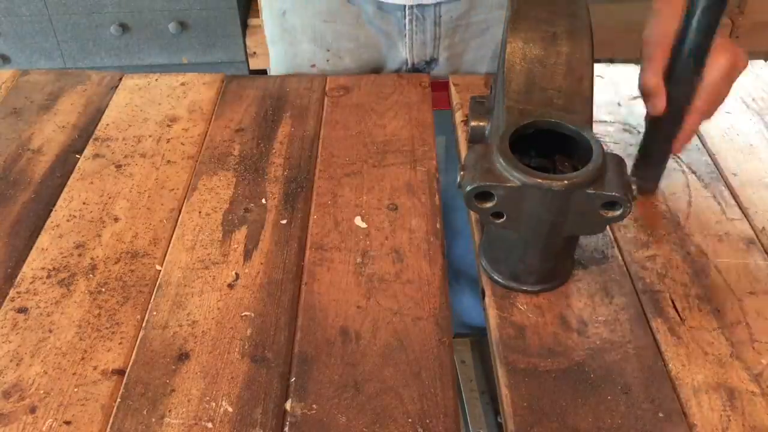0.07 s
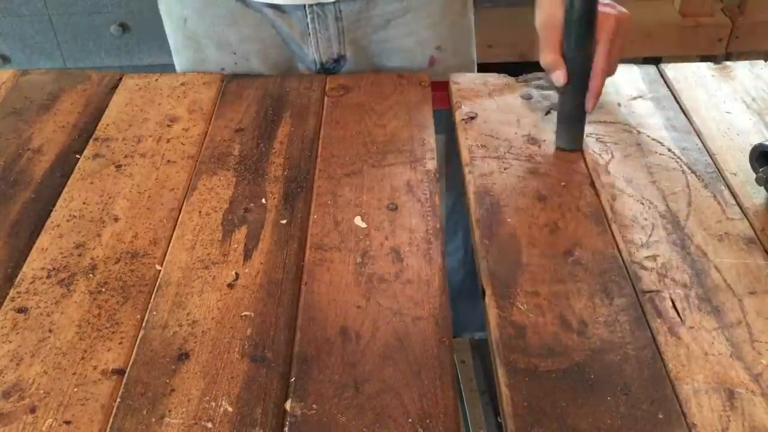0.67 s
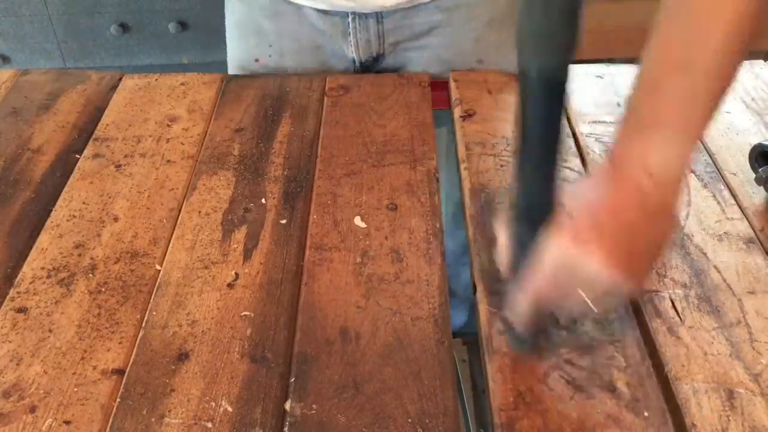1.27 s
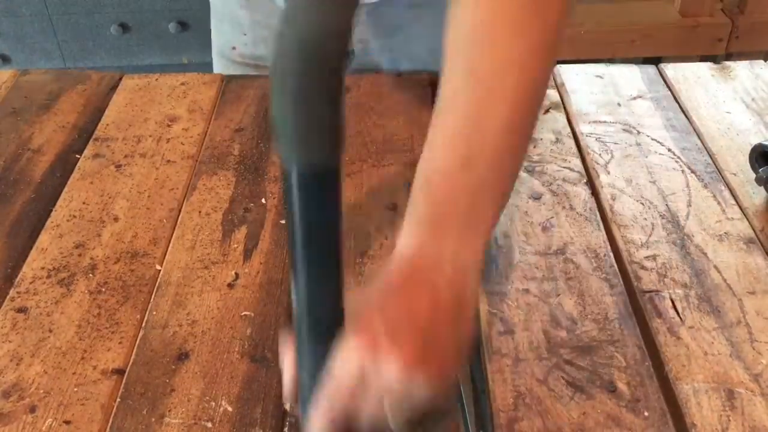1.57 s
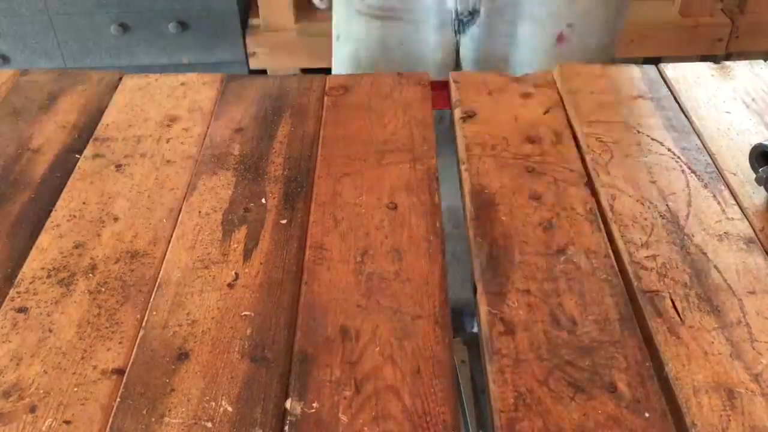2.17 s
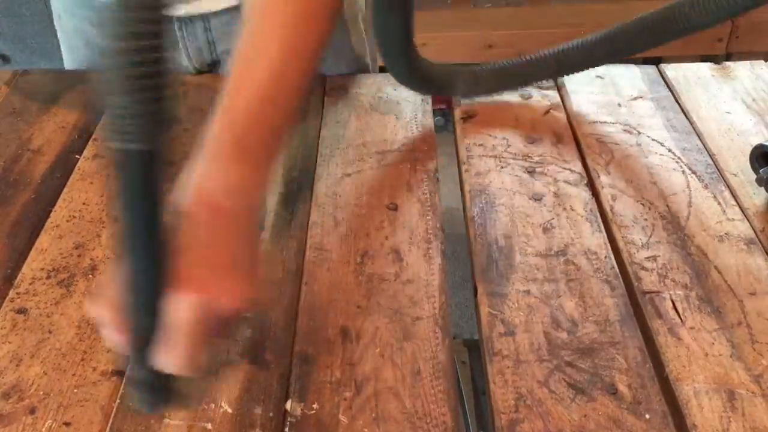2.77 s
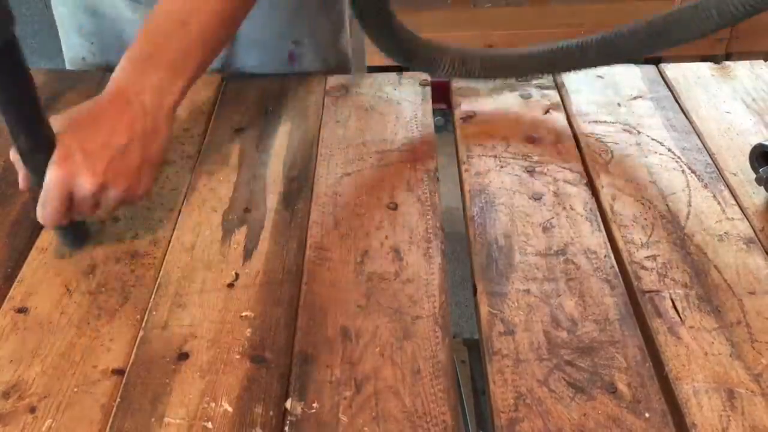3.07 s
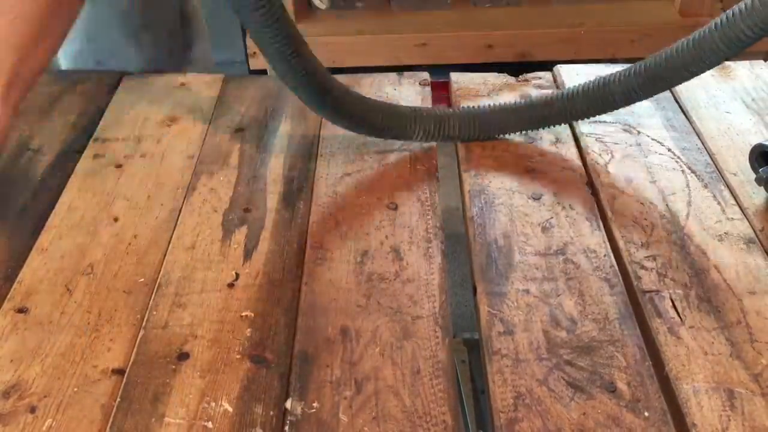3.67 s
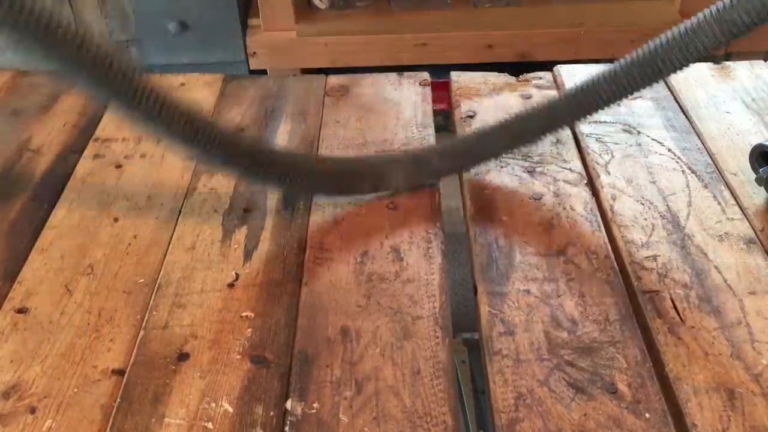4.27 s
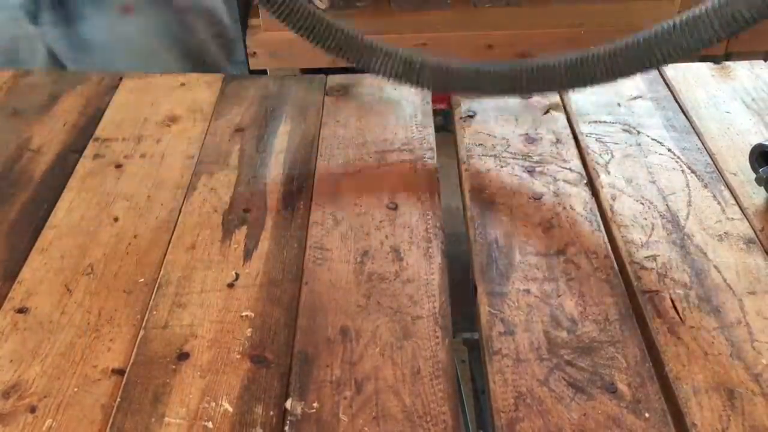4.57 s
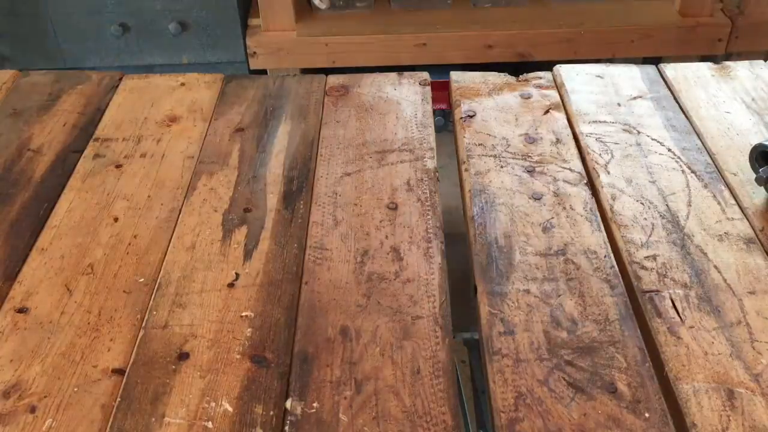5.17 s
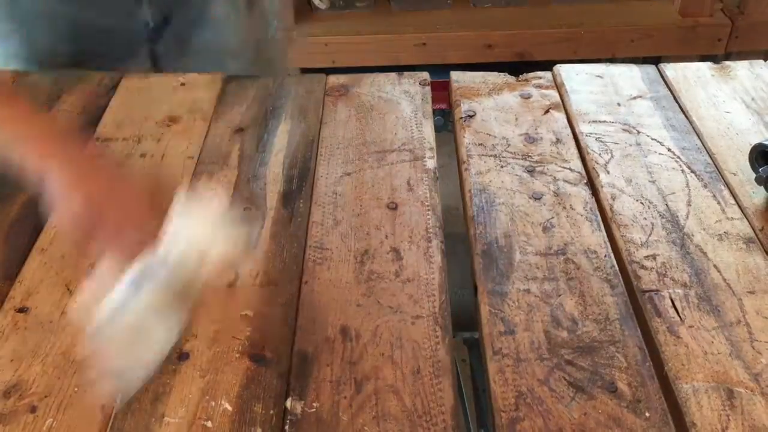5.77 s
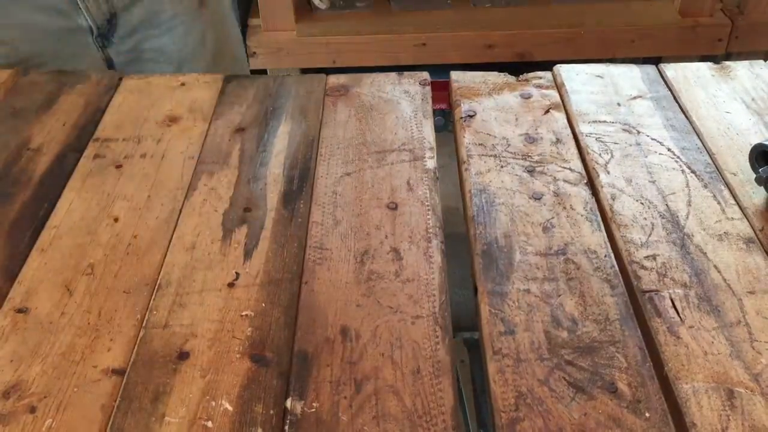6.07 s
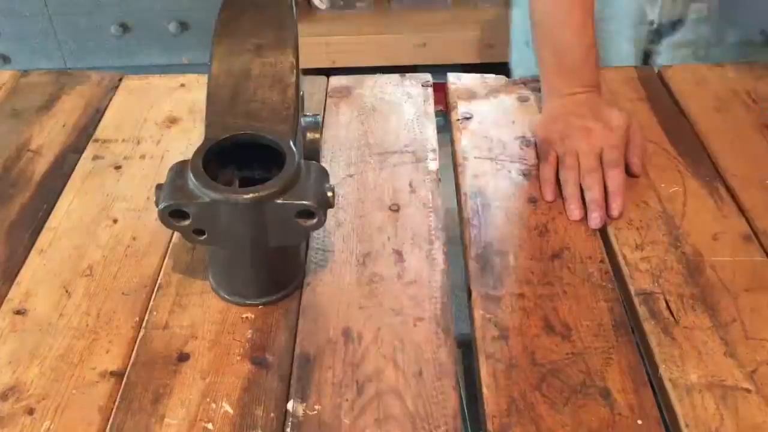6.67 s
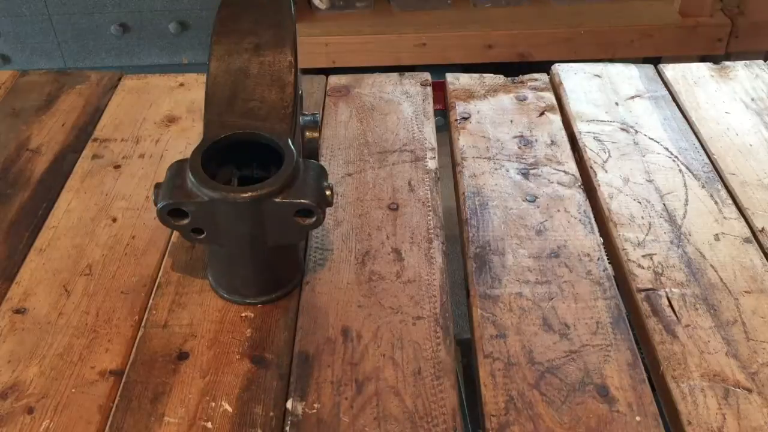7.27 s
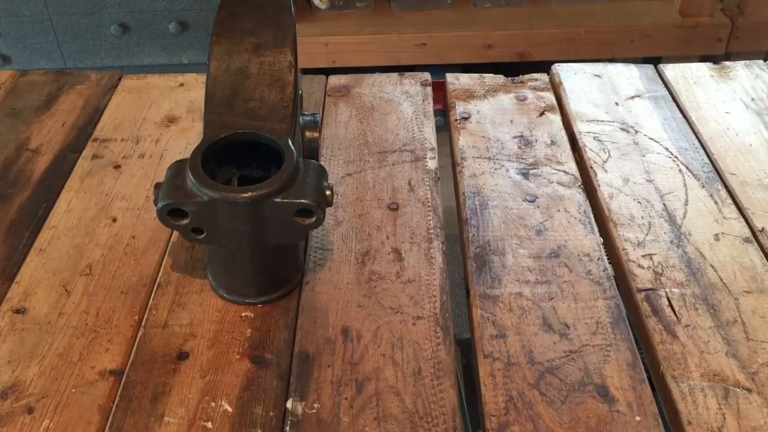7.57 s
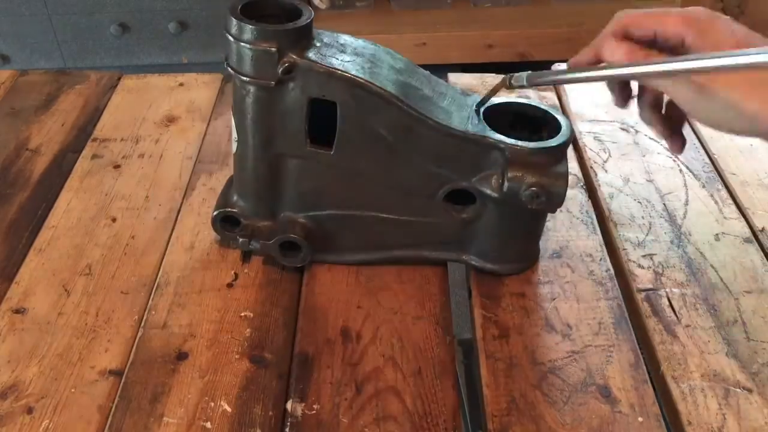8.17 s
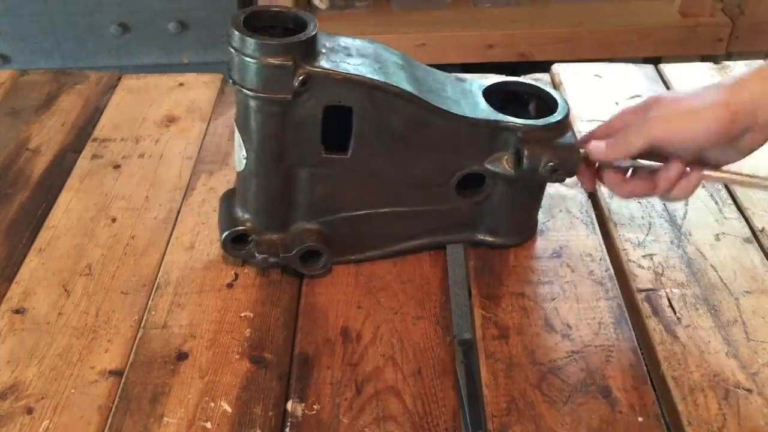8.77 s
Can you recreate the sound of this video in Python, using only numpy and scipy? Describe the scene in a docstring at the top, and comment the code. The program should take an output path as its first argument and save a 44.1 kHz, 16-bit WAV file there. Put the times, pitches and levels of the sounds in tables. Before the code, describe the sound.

A vacuum cleaner hisses and whines, then spins down, followed by quick knocks on wood and a wire brush scrubbing metal, all sped up.

```python
"""Workshop chores in fast motion, so every sound is high and short. First a vacuum cleaner hisses and
whines over a plank bench, sucking up grit; near 5 s it is switched off and spins down. Next a rag wipes
the planks while a steel casting and tools knock on them, followed by small slides and clicks. From about
8 s a wire brush on a rod scrubs and rattles in the casting's bores. A faint room hum lies under it all."""
import sys
import numpy as np
from scipy import signal
from scipy.fft import rfft, irfft, next_fast_len
from scipy.io import wavfile
from scipy.ndimage import map_coordinates

SR = 44100
rng = np.random.default_rng(int(sys.argv[2]) if len(sys.argv) > 2 else 0)


def transcribe(u):
    """Save the signal u as a 16-bit wav file named by the first command-line argument.

    u: samples, shape (n,) or (channels, n), limited to [-1, 1]; the rate is SR.
    q: integer samples, one column per channel.
    """
    v = np.clip(np.atleast_2d(u).T, -1, 1)
    q = np.round(v * 32767).astype(np.int16)
    wavfile.write(sys.argv[1], SR, q)


N = 398663


def amp(db):
    """Decibels to gain."""
    return 10 ** (np.asarray(db) / 20)


def unit(x):
    """Scale to rms 1."""
    return x / np.sqrt(np.mean(x ** 2) + 1e-20)


def clock():
    """The time of every sample, in seconds."""
    return np.arange(N) / SR


def automation(points):
    """A lane of straight ramps through (time [s], value) points."""
    return np.interp(clock(), *np.transpose(points))


def wobble(rate):
    """A smooth random modulator with rate knots a second."""
    return map_coordinates(rng.standard_normal(int(N * rate / SR) + 4), [clock() * rate])


def filtered(x, response):
    """EQ x with a gain that is a function of frequency."""
    size = next_fast_len(N + SR // 2)
    return irfft(rfft(x, size) * response(np.fft.rfftfreq(size, 1 / SR)), size)[..., :N]


def noise(spectrum):
    """Noise of rms 1 coloured by (frequency [Hz], level [dB]) points."""
    points_hz, db = np.transpose(spectrum)
    colour = lambda hz: amp(np.interp(np.log(hz + 1), np.log(points_hz + 1), db))
    return unit(filtered(rng.standard_normal(N), colour))


def ringing(modes):
    """Noise of rms 1 through (frequency [Hz], width [Hz], level [dB]) resonances."""
    body = lambda f: sum(amp(db) / (1 + (2 * (f - hz) / width) ** 2) for hz, width, db in modes)
    return unit(filtered(rng.standard_normal(N), body))


def tone(hz):
    """A sine of rms 1 that follows a pitch curve."""
    return np.sqrt(2) * np.sin(2 * np.pi * np.cumsum(hz) / SR)


def add(track, s, sound):
    """Mix a short sound into a track at time s."""
    part = track[round(s * SR):][:len(sound)]
    part += sound[:len(part)]


def hits(times, levels_db, attack, t60):
    """A percussive envelope that jumps at each hit and dies away; attack and t60 in seconds."""
    power, t = np.zeros(N), np.arange(SR // 8) / SR
    for s, db in zip(times, levels_db):
        add(power, s, (amp(db - 60 * t / t60) * (1 - np.exp(-t / attack))) ** 2)
    return np.sqrt(power)


def gates(times, lengths, levels_db, edge):
    """An envelope that holds for each length, with soft edges; edge in seconds."""
    power = np.zeros(N)
    for s, length, db in zip(times, lengths, levels_db):
        start = max(s - 4 * edge, 0)
        t = np.arange(round((length + 8 * edge) * SR)) / SR + start - s
        fade_in = (1 + np.tanh(t / edge)) / 2
        fade_out = (1 - np.tanh((t - length) / edge)) / 2
        add(power, start, amp(db) ** 2 * fade_in * fade_out)
    return np.sqrt(power)


# body of the airflow: (frequency [Hz], level [dB])
RUSH_EQ = [(20, -2), (400, -3.5), (950, -3), (1200, -3.5), (1500, -2), (2600, -1.5), (3300, -2), (3800, 0),
           (4300, -1), (5500, -5), (9000, -55)]
# bright fizz on top: (frequency [Hz], level [dB])
FIZZ_EQ = [(2500, -60), (4000, -12), (5000, -3), (5700, -3), (6700, -1), (8500, -2.5), (10500, -1.5),
           (12200, 0), (13000, -0.5), (15000, 4), (16000, -2)]
# the nozzle's cavity: (frequency [Hz], width [Hz], level [dB])
NOZZLE_MODES = [(1730, 240, -0.5), (3180, 410, -1), (12140, 610, 5), (13400, 450, 2.5), (15000, 520, -0.5)]
HOSE_LAG_S, RUSH_DB_PER_DECADE, FIZZ_DB_PER_DECADE = 0.032, 43.18, 34  # how the air follows fan speed


def suction():
    """Turbulent air in the nozzle and hose rings the nozzle's cavity at first and dies with the fan."""
    rush = amp(-45.5 + RUSH_DB_PER_DECADE * np.log10(coasting_speed(HOSE_LAG_S))) * noise(RUSH_EQ)
    fizz = amp(-37.5 + FIZZ_DB_PER_DECADE * np.log10(coasting_speed(0))) * noise(FIZZ_EQ)
    cavity = gates([0], [2.25], [-48], edge=0.02) * amp(1.9 * wobble(8.8)) * ringing(NOZZLE_MODES)
    fade_db = -90 * np.maximum(clock() - 5.27, 0)
    return amp(fade_db + 0.5 * wobble(40)) * (rush + fizz + cavity)


# the whine's drift with fan speed: (time [s], base pitch [Hz])
WHINE_PITCH = [(0, 4700), (0.42, 4700), (0.57, 4667), (0.68, 4706), (1, 4670), (1.5, 4729), (1.9, 4780),
               (2.25, 4662), (2.5, 4720), (2.75, 4720), (3.05, 4766), (3.3, 4723), (3.46, 4780), (4, 4720),
               (4.55, 4743), (4.92, 4690)]
# the whine's fader, low while the nozzle works close over the bench: (time [s], base level [dB])
WHINE_LEVEL = [(0, -50), (1, -46), (1.3, -55.5), (1.72, -54), (2.12, -40), (2.235, -56), (2.265, -36.5),
               (3.3, -39.0), (4.08, -36.5), (4.19, -41), (4.72, -38.5), (4.87, -39.5), (4.93, -57.5)]
# the nozzle seals on a plank for a moment and the unloaded fan races: (time [s], pitch rise [Hz])
NOZZLE_SEALS = [(0.32, 89), (1.13, 91), (1.35, 110), (2.08, 81), (2.83, 54), (3.12, 29), (3.67, 12),
                (4.61, 31)]
SEAL_RAMP_S, CHOKE_DB_PER_HZ = 0.04, 0.104
SKIM_START_S, SKIM_LENGTH_S, FLUTTER_HZ = 1.1, 1.0, 15.3  # skimming the planks adds flutter to the fan
SWITCH_OFF_S = 4.962


def fan():
    """The blades whine, higher and weaker when the nozzle is choked; the hose whistle rides on top."""
    skimming = gates([SKIM_START_S], [SKIM_LENGTH_S], [0], edge=0.018)
    surges_hz = sum(rise * np.exp(-((clock() - s) / SEAL_RAMP_S) ** 2) for s, rise in NOZZLE_SEALS)
    racing_hz = surges_hz + (5.5 + FLUTTER_HZ * skimming) * wobble(18)
    fan_hz = automation(WHINE_PITCH) + racing_hz
    rough_hz = fan_hz + (2 + 5 * skimming) * wobble(120)
    level_db = automation(WHINE_LEVEL) - CHOKE_DB_PER_HZ * racing_hz + 0.97 * wobble(29.97)
    whine = amp(level_db) * (tone(rough_hz) + amp(-28) * tone(2 * rough_hz))
    running = np.clip((SWITCH_OFF_S - clock()) / 0.03, 0, 1)
    return running * (whine + hose_whistle(fan_hz))


def hose_whistle(fan_hz):
    """A choked nozzle slows the air, so the hose starts to whistle, lower as the fan speeds up."""
    hz = 15700 - 3.6 * (fan_hz - 4732) + 30 * wobble(25) + 25 * wobble(250)
    choked = np.clip((fan_hz - 4705) / 30, 0, 1)
    return choked * amp(-43.5 + 4 * wobble(30.25)) * tone(hz)


def coasting_speed(lag, air_drag_s=0.168, friction_s=1.2):
    """The fan's share of full speed: after switch-off, air drag and then bearing friction brake it."""
    t = np.maximum(clock() - SWITCH_OFF_S - lag, 0)
    return np.exp(-t / friction_s) / (1 + t / air_drag_s)


# the vacuum's housing: (frequency [Hz], width [Hz], boost [dB])
HOUSING_MODES = [(3540, 530, 18), (2480, 280, 12)]
COAST_START_HZ, COAST_DB_PER_DECADE = 4690, 45


def spin_down():
    """After switch-off the whine glides down and fades, flaring in the housing's resonances."""
    speed = coasting_speed(0)
    hz = COAST_START_HZ * speed
    flare_db = sum(db / (1 + (2 * (hz - centre) / width) ** 2) for centre, width, db in HOUSING_MODES)
    level_db = -48 + COAST_DB_PER_DECADE * np.log10(speed) + flare_db + 3.5 * wobble(110)
    coasting = (speed < 1) * np.clip((hz - 700) / 400, 0, 1)
    return coasting * amp(level_db) * tone(hz * (1 + 0.0075 * wobble(300)))


# large chips and nozzle taps: (time [s], level [dB], ring pitch [Hz])
CHIP_HITS = [(.564, -32, 3740), (.566, -34, 1790), (0.596, -34, 7640), (1.272, -40, 6530),
             (1.329, -41, 6200), (1.488, -37.5, 3600), (1.53, -39, 3870), (1.796, -34.5, 2830),
             (1.865, -42, 2910), (1.91, -41, 3700), (1.961, -33.5, 7400), (1.966, -36, 3280),
             (2.058, -37.5, 6760), (2.53, -41, 3480), (3.57, -39, 2900)]
FINE_COUNT, FINE_CENTRE_HZ, CHIP_T60_S = 32, 3557, 0.043


def grit():
    """Chips each ring briefly in the tube; fine grit comes ever thicker as the nozzle skims on."""
    out, t = np.zeros(N), np.arange(SR // 25) / SR
    when, size, pitch = rng.random((FINE_COUNT, 3)).T
    fine_s = SKIM_START_S + SKIM_LENGTH_S * np.sqrt(when)
    fine_db = -45 + 8 * (size - 0.5)
    fine_hz = FINE_CENTRE_HZ * 2 ** (1.3 * (pitch - 0.5))
    for s, db, hz in [*CHIP_HITS, *zip(fine_s, fine_db, fine_hz)]:
        band = signal.butter(2, [hz * 0.88, hz * 1.18], "band", fs=SR, output="sos")
        ring = unit(signal.sosfilt(band, rng.standard_normal(len(t))))
        envelope = amp(db + 2 - 60 * t / CHIP_T60_S) * (1 - np.exp(-t / 0.00031))
        add(out, s, envelope * ring)
    return out


# the casting and tools land on the bench: (time [s], level [dB])
KNOCK_HITS = [(5.636, -40), (5.705, -24.5), (5.7174, -38), (5.861, -43.5), (6.032, -30), (6.118, -34),
              (6.1338, -16.5), (6.202, -41), (6.2667, -37.5), (6.3577, -33), (6.4405, -29), (6.491, -30.5),
              (6.5055, -20.5), (6.5163, -30), (6.5461, -10.5), (6.5687, -21.5), (6.6425, -25.5),
              (6.7803, -38.5), (7.5006, -17), (7.6227, -37), (7.66, -48), (7.855, -46), (7.913, -38.5),
              (7.9388, -37.5), (8.065, -37), (8.0942, -15.5)]
# the planks' resonances: (frequency [Hz], width [Hz], level [dB])
PLANK_MODES = [(1770, 400, -1), (2505, 58, 3.5), (2975, 260, 0), (3710, 390, -1.5), (4070, 230, -.5),
               (5070, 170, -4), (13300, 1200, -7)]
# bright transient of a hard contact: (frequency [Hz], level [dB])
CRACK_EQ = [(60, -20), (400, -25), (1350, -14), (2100, -0.5), (7000, -1), (9500, -4.5), (13500, 1.5),
            (16000, -6)]


def knocks():
    """Hard things meet the bench: a bright crack, the woody ring of the planks and a short tail."""
    s, db = np.transpose(KNOCK_HITS)
    ring_db = -22 + 0.62 * db  # the ring grows more slowly than the crack
    crack = hits(s, db - 7, attack=0.00018, t60=0.021) * noise(CRACK_EQ)
    ring = hits(s, ring_db, attack=0.00017, t60=0.035) * ringing(PLANK_MODES)
    # the three lowest modes linger, in a different balance at each spot on the bench
    spots_db = 3 * rng.standard_normal((len(s), 3)).T
    tail = sum(hits(s, ring_db - 18.5 + spot_db, attack=0.003, t60=0.079) * ringing([mode])
               for mode, spot_db in zip(PLANK_MODES, spots_db))
    return crack + ring + tail


# scrubs in the bores: (time [s], length [s], level [dB], squeal offset [dB])
BRUSH_STROKES = [(8.114, 0.0054, -31.5, 1), (8.141, 0.0091, -35, -20), (8.159, 0.044, -34.5, -20),
                 (8.228, 0.035, -38.5, -20), (8.277, 0.085, -34.5, -10.5), (8.368, 0.13, -38, -18),
                 (8.49, .11, -35.5, -19), (8.605, .01, -30, -15), (8.634, 0.013, -34.5, -9),
                 (8.656, .075, -42, -20), (8.725, 0.014, -33.5, -6), (8.743, 0.022, -39, -6),
                 (8.771, 0.092, -34.5, -3.5), (8.839, 0.015, -41, 11.5), (8.873, 0.041, -35, -3.5),
                 (8.921, 0.029, -32.5, -3), (8.955, .027, -40, -4), (8.999, 0.053, -38, -8)]
# wire scraping on steel: (frequency [Hz], level [dB])
BRISTLE_EQ = [(25, -3), (400, -4), (800, -2), (1600, -2), (3500, -1), (7000, 0.5), (10000, -2),
              (12500, 1.5), (16000, 3.5)]
# the bristles' squeal: (frequency [Hz], width [Hz], level [dB])
SQUEAL_MODES = [(6100, 450, -5), (6830, 500, -1), (7660, 1500, -1), (11200, 1100, -5.5)]
BITE_BOOST_DB = 6.5  # the wires dig in at the start of a stroke


def brush():
    """Wire bristles bite, then catch and slip on the steel, squealing mostly on the later strokes."""
    s, length, db, squeal_db = np.transpose(BRUSH_STROKES)
    catching = unit(amp(2.2 * wobble(130) + 2.75 * wobble(1500)))
    bite = hits(s, db + BITE_BOOST_DB, attack=0.0012, t60=0.047)
    pressure = np.hypot(gates(s, length, db, edge=0.0035), bite)
    dragging = gates([s[0]], [s[-2] - s[0]], [-44], edge=0.003)  # light contact between strokes
    scrape = np.maximum(pressure, dragging) * noise(BRISTLE_EQ)
    squeal = gates(s, length, db + squeal_db, edge=0.0015) * ringing(SQUEAL_MODES)
    return catching * (scrape + squeal)


# the brush bumps in the bore: (time [s], level [dB])
BORE_BUMPS = [(8.112, -22), (8.251, -32.5), (8.328, -39), (8.393, -37.5), (8.413, -36.5), (8.436, -35),
              (8.456, -35), (8.496, -32), (8.532, -35), (8.564, -36), (8.576, -34.5), (8.613, -30.5),
              (8.634, -31), (8.646, -33.5), (8.944, -30), (9.007, -34.5)]


def bumps():
    """Each bump in the bore is a scratchy tick and a falling pop with a brief hollow tail."""
    s, db = np.transpose(BORE_BUMPS)
    tick_eq = [(300, -24), (700, 3), (3000, 2.5), (7000, -4), (16000, -7.5)]
    hollow_eq = [(400, -22), (620, 3), (1400, -1), (3000, -19)]
    ticks = hits(s, db + 11, attack=0.00042, t60=0.013) * noise(tick_eq)
    hollow = hits(s + 0.0013, db, attack=0.0016, t60=0.022) * noise(hollow_eq)
    pops, t = np.zeros(N), np.arange(SR // 40) / SR
    swell = t / 0.0014 * np.exp(1 - t / 0.0015)
    for start, level, (detune, phase) in zip(s, db, rng.standard_normal((len(s), 2))):
        hz = (600 + 1300 * np.exp(-t / 0.00158)) * np.exp(0.15 * detune)
        add(pops, start, amp(level - 2) * swell * np.sin(2 * np.pi * np.cumsum(hz) / SR + phase))
    return ticks + hollow + pops


# wipes of the rag: (time [s], length [s])
RAG_PASSES = [(5.606, .27), (5.949, 0.19), (6.199, 0.247), (6.511, 0.226)]
# steel parts slide over the planks: (time [s], length [s], level [dB], rumble offset [dB])
STEEL_SLIDES = [(5.422, 0.025, -52.5, -14), (5.457, 0.0087, -39, -21), (7.194, 0.036, -59, -23),
                (7.2905, 0.01, -34.5, -16.5), (7.295, 0.024, -43.5, -14), (7.326, 0.018, -39.5, -13),
                (7.402, 0.0059, -48.5, -6.5), (7.575, .073, -65, -13), (7.779, 0.029, -55, -19),
                (7.92, 0.047, -57, -19), (8.066, .034, -51, -31)]
# friction hiss on wood: (frequency [Hz], level [dB])
FRICTION_EQ = [(100, -26.5), (600, -10.5), (1400, -1), (1800, -6.5), (7000, -1.5), (10500, -0.5),
               (13000, 1.5), (16000, -1)]
# the planks under a heavy slide: (frequency [Hz], level [dB])
RUMBLE_EQ = [(25, 0.5), (400, 2), (1200, 4.5), (2500, -28), (6000, -43)]
RAG_DB, RAG_LIFT_S = -56, 6.78  # the rag trails between passes until it is lifted


def wipes_and_slides():
    """Cloth and steel drag over the grain, ring the planks and shake them."""
    s, length = np.transpose(RAG_PASSES)
    passes = gates(s, length, np.full(len(s), RAG_DB), edge=0.0026)
    trailing = gates([s[0]], [RAG_LIFT_S - s[0]], [RAG_DB - 11.5], edge=0.003)
    rag = np.maximum(passes, trailing)
    slide_s, slide_length, db, rumble_db = np.transpose(STEEL_SLIDES)
    steel = gates(slide_s, slide_length, db, edge=0.0014)
    steel_weight = gates(slide_s, slide_length, db + rumble_db, edge=0.0011)
    grain = unit(amp(0.7 * wobble(70) + 1.2 * wobble(250) + 2.4 * wobble(1100)))
    scuffs = np.clip(wobble(70), -1, 1.8)  # each catch rings the lower modes
    hiss = noise(FRICTION_EQ) + amp(-12.5 + 7 * scuffs) * ringing(PLANK_MODES[:4])
    rumble = (amp(-14.5) * rag + steel_weight) * noise(RUMBLE_EQ)
    return grain * ((rag + steel) * hiss + rumble)


# steel touches steel: (time [s], level [dB])
STEEL_CLICKS = [(6.886, -44.5), (7.1978, -34), (7.217, -35.5), (7.402, -32.5), (7.4818, -36.5),
                (7.8888, -41.5)]


def clicks():
    """Light, dry clicks of steel on steel, which leave the planks still."""
    s, db = np.transpose(STEEL_CLICKS)
    return hits(s, db - 8.5, attack=0.00014, t60=0.025) * noise(CRACK_EQ)


# spells of light handling: (start [s], end [s], tick level [dB])
HANDLING_SPELLS = [(5.306, 5.44, -53), (5.484, 5.6, -58.5), (6.929, 7.18, -65.5)]


def handling(spacing_s=0.024):
    """Loose runs of ticks as things are shifted about and the hose is put away."""
    out = np.zeros(N)
    for start, end, db in HANDLING_SPELLS:
        slots = np.arange(start, end, spacing_s)
        late, accent = rng.standard_normal((len(slots), 2)).T
        out += hits(slots + 0.0067 * late, db + 4 * accent, attack=0.00017, t60=0.022) * noise(CRACK_EQ)
    return out


# the squeak's glide: (time [s], pitch [Hz], level [dB])
SQUEAK_GLIDE = [(7.03, 3020, -82), (7.08, 3090, -77), (7.21, 3480, -81)]


def squeak():
    """A faint, ragged squeak rises, with a weaker partial below it."""
    s, pitch, db = np.transpose(SQUEAK_GLIDE)
    hz = np.interp(clock(), s, pitch)
    sounding = (clock() > s[0]) & (clock() < s[-1])
    envelope = sounding * amp(np.interp(clock(), s, db) + 6.8 * wobble(60))
    return envelope * (tone(hz + 25 * wobble(300)) + amp(-8) * tone(0.73 * hz + 25 * wobble(300)))


# room tone: (frequency [Hz], level [dB])
ROOM_EQ = [(15, -68.5), (25, -43.5), (274, -33), (482, -25.5), (684, -4.5), (826, -11), (970, -6),
           (1080, -11), (6210, -30), (15500, -29)]
# partials of the hum: (pitch [Hz], level [dB])
HUM_PARTIALS = [(662, -79), (947, -80)]


def room():
    """A bed of quiet workshop air and a faint wavering hum."""
    hum = sum(amp(db + 1.3 * wobble(21)) * tone(hz + 2.54 * wobble(25)) for hz, db in HUM_PARTIALS)
    return amp(-72.5 + 2.1 * wobble(29)) * noise(ROOM_EQ) + hum


def scene():
    """A mono mix on both channels, heard from one point above the bench."""
    vacuum = suction() + fan() + spin_down()
    bench_work = knocks() + clicks() + wipes_and_slides() + handling() + squeak()
    mono = vacuum + bench_work + brush() + bumps() + room() + grit()
    return np.array([mono, mono])


def record(dry):
    """A soft clipper rounds off the highest peaks, then a steep low-pass trims the very top."""
    ceiling, cutoff_hz = 0.18, 15850
    rounded = dry / (1 + (dry / ceiling) ** 4) ** (1 / 4)
    return filtered(rounded, lambda hz: np.clip((cutoff_hz - hz) / 150 + 0.5, 0, 1))


dry = scene()
out = record(dry)
transcribe(out)
```